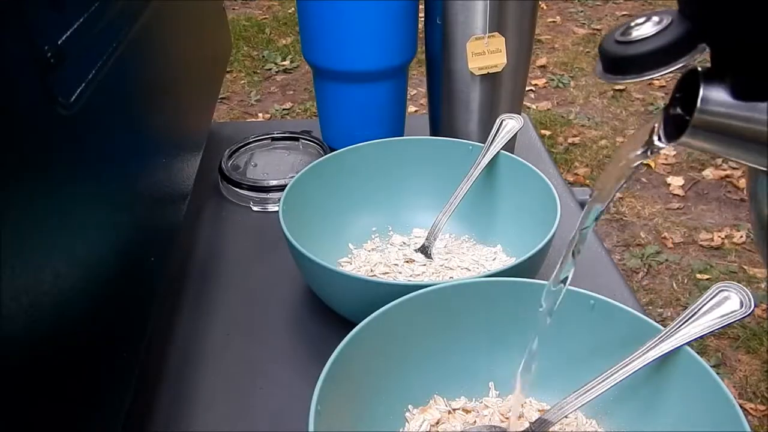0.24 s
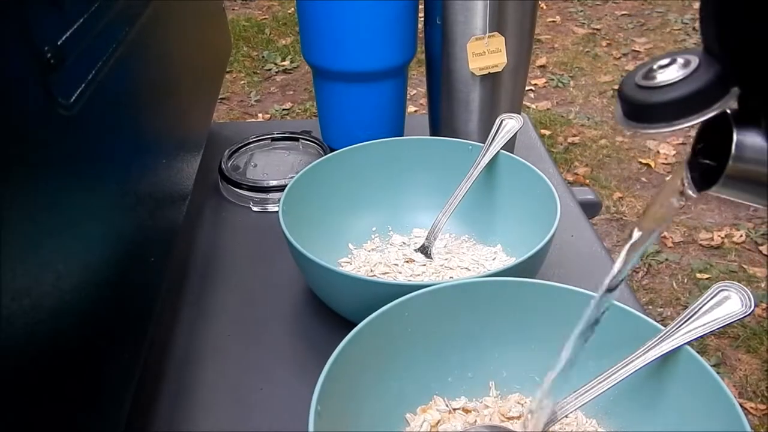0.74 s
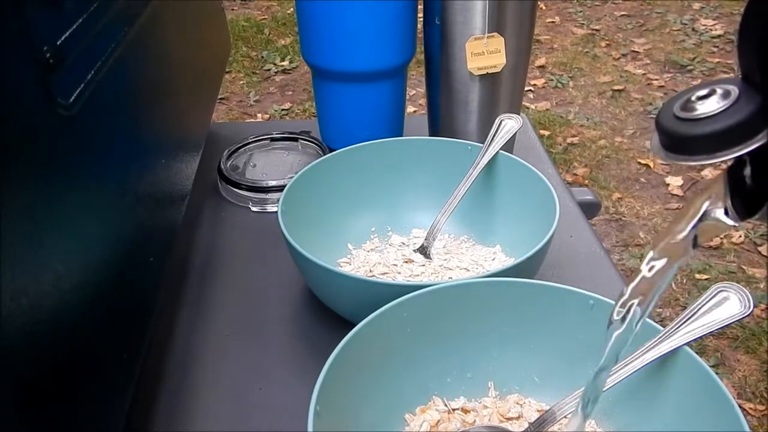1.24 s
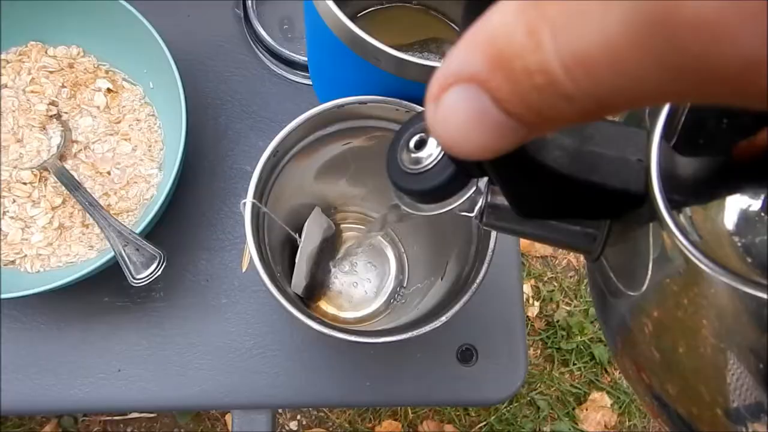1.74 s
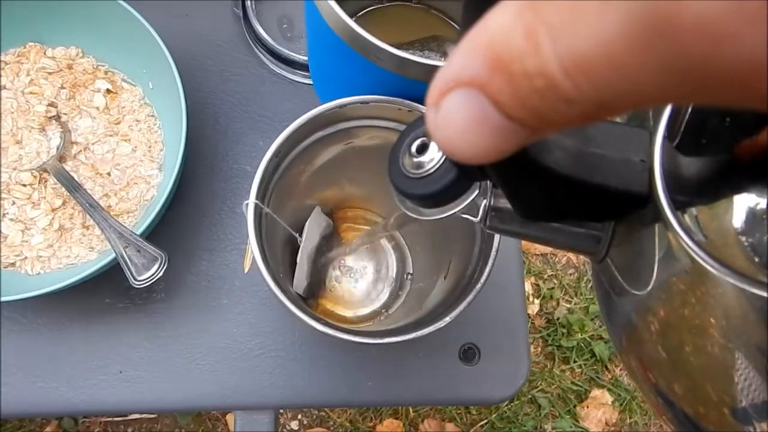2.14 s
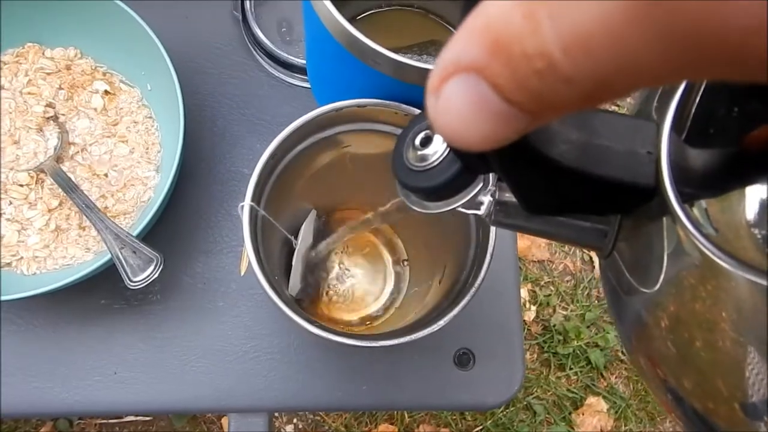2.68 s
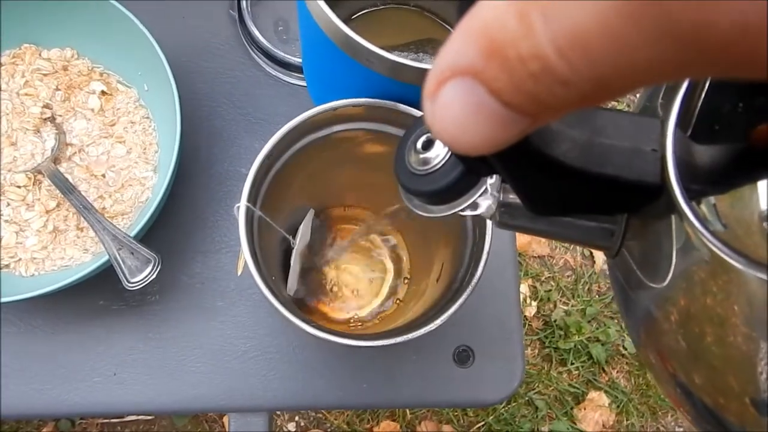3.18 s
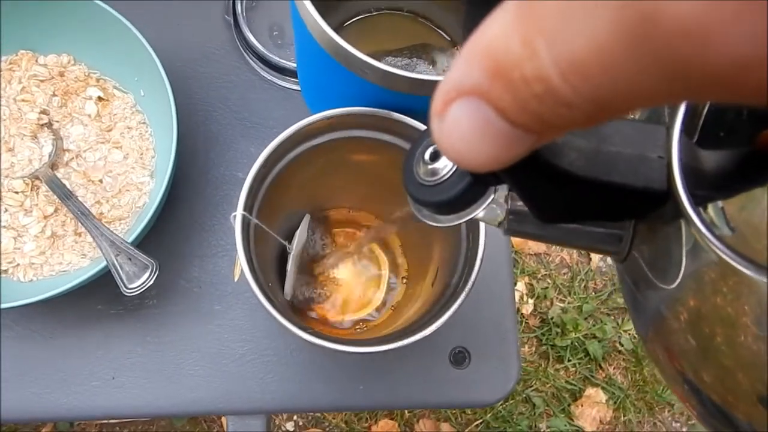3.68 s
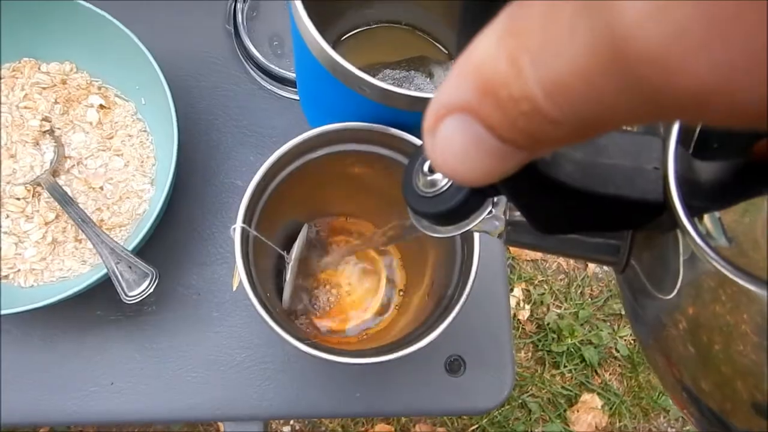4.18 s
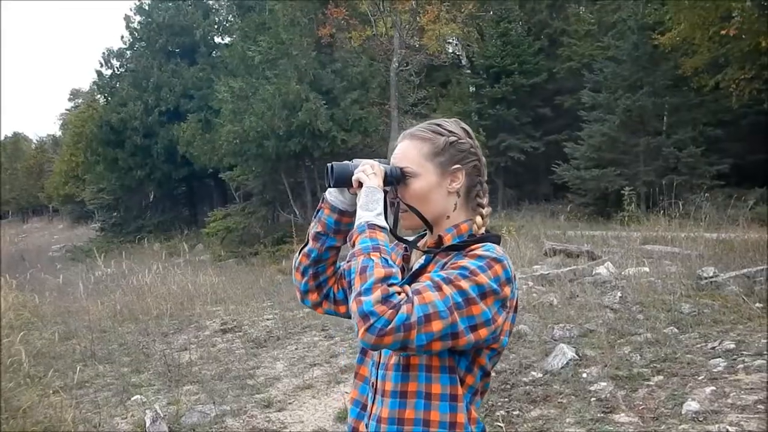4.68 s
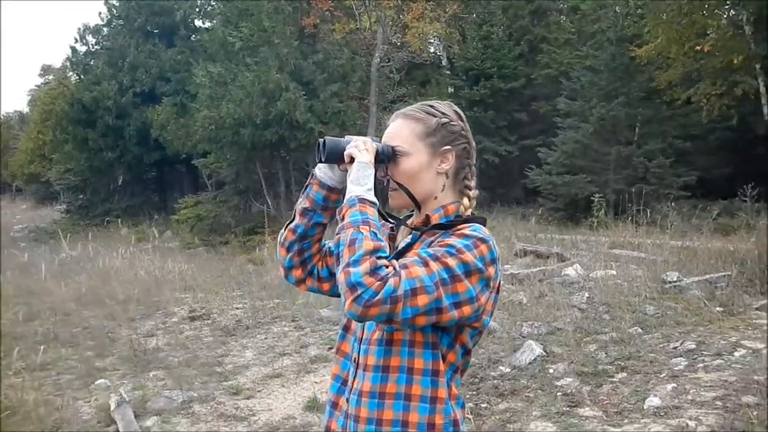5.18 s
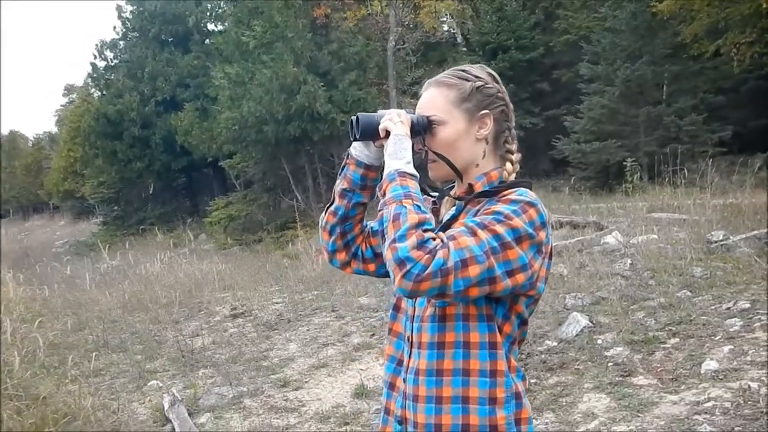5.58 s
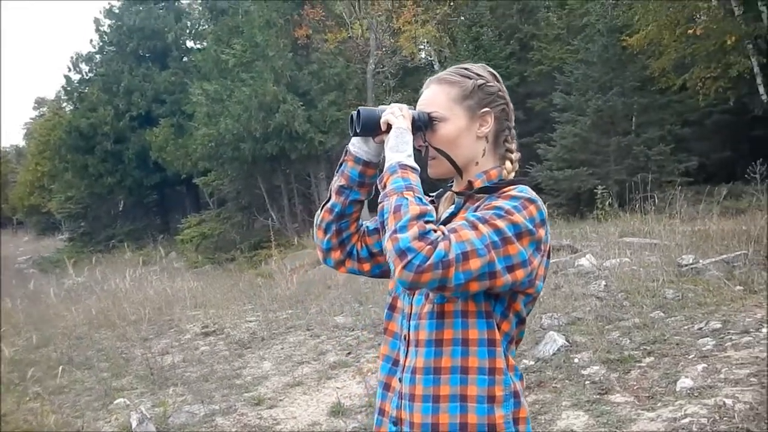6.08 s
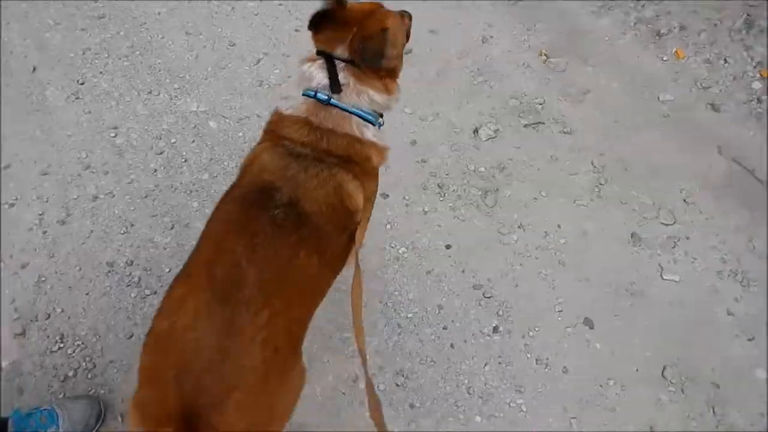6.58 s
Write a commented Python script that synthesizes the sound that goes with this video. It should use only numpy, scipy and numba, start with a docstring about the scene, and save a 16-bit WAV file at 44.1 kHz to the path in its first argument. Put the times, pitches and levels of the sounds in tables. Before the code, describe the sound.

Outdoors, close to the microphone, a thin stream of water fizzes and drips on dry oats with a small knock. It cuts to splashy pouring in a steel mug, hollow and ringing, growing denser as it fills, with metallic kettle knocks. The pouring stops abruptly into a quiet meadow with a faint bird whistle, small ticks and soft lapping water. After a tiny gap, gravel crunches underfoot.

```python
"""Campsite, heard close: drops and fizz of hot water (short noisy pings) spatter into a bowl of oats, with a
knock. The stream then slaps into a tall steel mug: pings and noise drive air column resonances that rise as it
fills, while rim resonances spray and kettle knocks (damped modes) ring out. After a hard cut, a quiet meadow:
thin bird whistles (gliding sines), then lapping grains and gurgling bubbles (rising sines). After a short gap,
steps crunch on gravel (clumped grains). Leaves, hum and breeze (shaped noise) lie under it all; under the mug
the pour swells the hiss and the low noise."""
import sys
import numpy as np
from scipy import signal
from scipy.fft import rfft, irfft, next_fast_len
from scipy.io import wavfile
from scipy.ndimage import uniform_filter1d, map_coordinates
from numba import njit

SR = 44100
rng = np.random.default_rng(int(sys.argv[2]) if len(sys.argv) > 2 else 0)


def to_wav(sig):
    """Store sig (one row per channel, or 1-D mono) as 16-bit WAV at the path in sys.argv[1].

    Samples outside -1..1 are clipped; the rate is SR.
    """
    pcm = np.clip(np.atleast_2d(sig), -1, 1) * 32767
    pcm = np.round(pcm).astype(np.int16)
    wavfile.write(sys.argv[1], SR, pcm.T)  # frames by channels


N = 301016

# Levels are relative: sources pass later gains and filters. Colours are dB per Hz. background of each shot:
# start t/s, wide hiss level/dB at start, at end (leaves; in the mug shot the pour's hiss), low noise level/dB
# at start, at end (breeze; in the mug shot the slosh of the pour), microphone hiss level/dB
SHOT_BACKGROUND = [(0, -57.5, -56, -66, -78, -73), (1.75, -57, -53, -73, -60.5, -72),
                   (4.47, -58, -62, -74.5, -80, -77), (5.25, -60, -59, -63, -72, -76),
                   (5.43, -60, -62, -92, -80, -77.5), (6.49, -53, -55.5, -65, -84, -74.5)]
# colour of the far leaves: f/Hz, level/dB
LEAF_COLOUR = [(100, -11.5), (150, -5.5), (300, -7.5), (600, -8.5), (1200, -7), (2200, -11.5), (4000, -6),
               (8000, -11)]
# left-right likeness of the leaves: f/Hz, correlation
LEAF_ALIKE = [(60, 0.21), (180, 0.76), (550, 0.18), (1650, 0.27), (4970, 0.049), (15000, 0.0)]
# colour of the distant hum: f/Hz, level/dB
HUM_COLOUR = [(25, -33), (45, -16), (63, -2), (85, -16), (130, -18), (300, -58)]
# swell of the distant hum: t/s, level/dB
HUM_LEVEL = [(0, -70), (.11, -61), (.25, -69), (.8, -69.5), (1.1, -63), (1.4, -68), (1.74, -79),
             (2.45, -65), (2.8, -80), (3.2, -65.5), (3.7, -67.5), (4.4, -71), (4.8, -76), (5.15, -77),
             (5.3, -72), (5.5, -92), (6.42, -79), (6.6, -64), (6.83, -86)]
# colour of the breeze buffeting the ports: f/Hz, level/dB
BREEZE_COLOUR = [(25, -25), (50, -9.5), (90, -1.8), (160, -4.5), (300, -13.5), (600, -44.5)]
GUST_DB, GUSTS_PER_S = 4, 3.7
LOW_BALANCE_DB = [[1.2], [-1.2]]  # hum and breeze lean left

# bird whistles, two voices and a faint chip: t/s, length/s, start f/Hz, end f/Hz, start level/dB
WHISTLES = [(4.87, .21, 3605, 3320, -58.5), (4.922, .18, 2740, 2520, -70), (5.898, .05, 3250, 3330, -65)]
CHIRP_EDGE_S, CHIRP_END_DB = .02, -79  # every whistle heads for the same end level
CHIRP_BEND, CHIRP_FLUTTER_DB = 3.2, 4  # the pitch holds, then slides

# wavelets lapping the shore: crest t/s, level/dB
LAPS = [(5.266, -58), (5.279, -58), (5.303, -59), (5.344, -51), (5.367, -59), (5.456, -57), (5.48, -62),
        (5.525, -63), (5.563, -60), (5.6, -61), (5.63, -65), (5.675, -62), (5.72, -66), (5.83, -66),
        (5.93, -66)]
WAVE_RISE_S, WAVE_FALL_S = .003, .012
WASH_S, WASH_DB, WASH_FALL_S = 5.27, -59.5, .6  # one long wash under the wavelets
# colour of the lapping: f/Hz, level/dB
WATER_COLOUR = [(100, -4), (300, -13.5), (1100, -1.5), (2200, -2.5), (4300, 0.5), (9000, -28)]
# weight shifts on the gravel: peak t/s, level/dB
WEIGHT_SHIFTS = [(6.61, -45), (6.705, -48), (6.795, -54)]
CRUNCH_RISE_S, CRUNCH_FALL_S = .022, .016
# steady grit under the shoes: t/s, level/dB
SHOE_GRIT = [(6.508, -54), (6.83, -58)]
# colour of the gravel: f/Hz, level/dB
STONE_COLOUR = [(100, -17), (400, -10), (1700, -2.5), (4300, -1), (9000, -19)]
# small ticks in the meadow and stones under the shoes: t/s, level/dB, f/Hz
SMALL_TICKS = [(4.567, -43.5, 1050), (4.649, -55, 1090), (4.755, -48, 2090), (5.025, -56, 1000),
               (5.097, -54, 1100), (5.342, -49, 1070), (5.348, -50, 2900), (5.387, -46.5, 4240),
               (5.479, -56, 2230), (5.6, -47, 3320), (5.708, -54, 1100), (5.832, -50, 2210),
               (6.514, -50, 1360), (6.541, -47, 1270), (6.607, -45, 4300), (6.642, -39, 4210),
               (6.71, -44, 1770), (6.775, -35, 1660)]

# large bubbles and gurgles: t/s, level/dB, f/Hz, t60/s
BIG_BUBBLES = [(1.769, -47, 210, .11), (1.811, -48.5, 294, 0.14), (1.85, -40, 290, .048),
               (1.871, -37, 308, 0.042), (1.899, -43, 297, .093), (2.011, -43, 297, .14),
               (2.03, -44.5, 529, 0.38), (2.07, -40.5, 568, 0.18), (5.265, -42, 543, .023),
               (5.271, -50, 1000, .091), (5.3, -56, 417, .12), (5.366, -51, 1050, 0.052),
               (5.451, -48, 1310, .069), (5.467, -52, 297, 0.11), (5.505, -57, 700, .2),
               (5.61, -56, 1050, .2), (5.562, -44.5, 1450, .038), (5.9, -54, 480, .071),
               (5.912, -56, 700, .04), (5.922, -52, 860, .04), (5.932, -44, 1030, .034),
               (6.095, -50.5, 1100, .015), (6.27, -62.5, 520, .15), (6.34, -60, 592, .098),
               (6.39, -59, 1926, 0.066)]
BUBBLE_RISE = .09  # the pitch gains twice this share over one t60
# kettle and spoon knocks: t/s, level/dB, brightness/dB per octave
METAL_KNOCKS = [(0.8375, -46.5, 4), (2.754, -42, 1), (2.7603, -16.5, 1.8), (3.4965, -36, 1),
                (3.5005, -29, -8), (4.3865, -36, 1.5)]
# modes of the kettle: f/Hz, level/dB, t60/s
KETTLE_MODES = [(224, -20, 0.08), (322, -3, 0.03), (430, -8, .06), (604, -10, 0.045), (860, -1, 0.028),
                (1016, -5, 0.03), (1560, -9.5, 0.03), (1920, -15, 0.03), (2230, -15, .03),
                (3244, -22, 0.033), (4400, -12, 0.011)]

# dense spatter of the stream on the oats: t/s, level/dB
OAT_FLOW = [(.065, -74), (.075, -50.5), (.16, -53.5), (.19, -64.5), (.38, -62), (.465, -52), (.53, -55),
            (.62, -51), (.92, -51.5), (.96, -60), (1.12, -54.5), (1.2, -47.5), (1.27, -59.5), (1.4, -54.5),
            (1.58, -55), (1.69, -51), (1.75, -54)]
# colour of that spatter: f/Hz, level/dB
OAT_COLOUR = [(200, -2.5), (650, -16), (1700, -11.5), (3000, -2.5), (6000, 1), (12000, -5)]
# single drops in the bowl: t/s, level/dB, f/Hz
OAT_DROPS = [(0.076, -44, 420), (0.077, -46, 1500), (0.088, -48, 400), (0.105, -42, 6000),
             (0.478, -42, 3000), (0.523, -42, 4300), (0.68, -44, 1700), (0.138, -36, 4000),
             (0.149, -34, 4000), (0.154, -28.5, 7540), (0.205, -36.5, 4140), (0.235, -47, 4200),
             (0.288, -41, 4280), (0.326, -34.5, 4250), (0.421, -39.5, 4520), (0.459, -37.5, 4500),
             (0.58, -32.5, 5500), (0.836, -28, 1610), (0.891, -35, 5600), (0.922, -29.5, 3220),
             (1.157, -44, 2920), (1.184, -34.5, 3200), (1.192, -34, 5000), (1.209, -27, 3200),
             (1.242, -37, 2880), (1.371, -37, 5170), (1.472, -38.5, 2980), (1.486, -33.5, 3120),
             (1.498, -35, 3120), (1.516, -39, 3670), (1.537, -31.5, 4560), (1.611, -40, 3120),
             (1.625, -39, 3100), (1.647, -44, 3000), (1.688, -36, 3040)]

# stream into the mug between the slaps: t/s, level/dB
POUR_FLOW = [(1.75, -49.5), (1.93, -59), (2.1, -50), (2.3, -56.5), (2.38, -60.5), (2.55, -54),
             (2.85, -51.5), (2.93, -54), (3.04, -47), (3.13, -64.5), (3.33, -43), (3.41, -61), (3.5, -43.5),
             (3.61, -54), (3.86, -41), (4.05, -47), (4.14, -43.5), (4.465, -44.5)]
# slaps of the broken stream: t/s, upper modes level/dB, lowest mode level/dB, spray level/dB
STREAM_SLAPS = [(1.7678, -26, -54.5, -41.5), (1.778, -30, -55, -48), (1.8042, -37, -57, -66),
                (1.8415, -31.5, -67, -47), (1.8671, -33, -63, -44), (1.897, -35, -62, -49),
                (1.9504, -30, -58, -36), (1.964, -29, -47, -36), (1.9998, -35.5, -62, -46),
                (2.0452, -34, -46, -42), (2.0946, -25, -46, -41.5), (2.084, -40, -50, -43),
                (2.113, -25, -56, -52), (2.1714, -40, -48, -45.5), (2.2042, -27.5, -41.5, -65),
                (2.2377, -24, -43.5, -62), (2.284, -32, -50, -50), (2.3043, -31, -46.5, -44.5),
                (2.32, -38, -55, -45), (2.382, -35, -60, -58), (2.5025, -37, -49, -40.5),
                (2.5353, -30, -40.5, -45.5), (2.5704, -26.5, -34.5, -46), (2.6251, -35, -58, -46),
                (2.6881, -33, -39, -43), (2.7082, -31, -38, -46.5), (2.7294, -29, -35.5, -40),
                (2.7601, -24, -36, -32), (2.819, -33, -59, -44), (2.887, -31, -47, -43.5),
                (2.975, -35, -40, -54), (2.999, -31, -48, -46), (3.041, -26.5, -42, -67),
                (3.0748, -42, -41, -51), (3.1097, -35, -40.5, -52), (3.1576, -35, -43, -43.5),
                (3.202, -28, -41, -45), (3.215, -36, -43, -40), (3.233, -19, -34.5, -38.5),
                (3.2939, -32, -31, -28), (3.3147, -39, -43, -40), (3.345, -19.5, -55, -34),
                (3.3687, -18, -39, -36), (3.4042, -34, -47, -42), (3.426, -19, -33, -33.5),
                (3.4466, -17, -30, -30.5), (3.4767, -26, -33.5, -44), (3.5093, -18, -27.5, -32),
                (3.536, -25.5, -50, -38), (3.5497, -25, -37.5, -42), (3.5697, -29, -48, -47),
                (3.588, -27, -44, -46), (3.5996, -35, -67, -43), (3.6337, -18.5, -42.5, -40),
                (3.6698, -30, -50, -36.5), (3.6958, -28, -32.5, -33.5), (3.7104, -13, -35, -32.5),
                (3.7195, -21, -42, -44), (3.7294, -33, -28.5, -21), (3.7468, -17, -30, -32.5),
                (3.7677, -25, -50, -37), (3.805, -30, -44, -36), (3.8144, -23.5, -27, -40),
                (3.838, -22, -38, -36), (3.8471, -14.5, -29, -36), (3.8603, -23, -34, -28.5),
                (3.8855, -33, -40, -55), (3.9146, -13.5, -37, -46), (3.9304, -23, -38, -30),
                (3.947, -26, -36, -44), (3.9887, -25, -32, -32.5), (4.0127, -22, -40, -38),
                (4.0321, -18, -30.5, -43), (4.0522, -25, -29.5, -27), (4.0615, -21, -33, -37),
                (4.091, -25, -32, -36), (4.1145, -19, -38, -48), (4.126, -22, -45, -41),
                (4.1379, -19, -47, -40), (4.1614, -20.5, -39, -31.5), (4.171, -25, -35, -43),
                (4.2042, -15.5, -47, -29), (4.2175, -24, -34, -31), (4.243, -32, -47, -29.5),
                (4.2506, -11.5, -30.5, -32), (4.281, -30, -36, -43), (4.289, -33, -49, -37),
                (4.2985, -19, -30, -30), (4.3195, -20, -47, -53), (4.337, -26, -46, -36),
                (4.3464, -22, -35, -38), (4.355, -21, -46, -40), (4.369, -13, -49, -32.5),
                (4.3865, -18, -24.5, -35), (4.4143, -17, -39, -36), (4.422, -22, -42, -35.5),
                (4.4417, -19, -58, -33.5), (4.4567, -28, -33, -42.5)]
# the air column shortens and the pool heaves more: t/s, lowest mode f/Hz, heave level/dB
MUG_FILL = [(1.75, 580, -6.5), (2.05, 598, -4.5), (2.6, 629, 1.5), (3.3, 630, 3.5), (4.465, 661, -3)]
# modes of the air column: multiple of the lowest f, width/Hz, level/dB
COLUMN_MODES = [(1, 56, -3), (1.97, 200, -8.5), (2.9, 150, -2.5), (3.25, 200, -7)]
# high resonances of the mug: f/Hz, width/Hz, level/dB
RIM_MODES = [(3170, 450, -6), (3740, 250, -5), (4230, 400, -8), (5923, 350, -6), (7820, 1100, -5)]
# colour of the grains in the mug: f/Hz, level/dB
POUR_COLOUR = [(150, -21.5), (500, 2.5), (9000, -5), (15000, -10.0)]
PUSH_DB, STRIKE_DB, SPRAY_DB = 34.5, 9.5, 21.5  # slap drive of lowest mode, upper modes and rim
STIR_DB, STIR_RISE_S, STIR_FALL_S = -36, 0.0039, 0.022  # each slap stirs up the patter

# difference between the ports for close sounds: f/Hz, level/dB
PORT_SIDE = [(100, -25), (700, -28), (1300, -18), (2400, -17), (4400, -7.5), (8000, -5.5), (15000, -10)]
# paths that reach one port more than the other: delay/ms, gain
SIDE_PATHS = [(0.018, 0.41), (.35, 0.34), (.68, 0.61), (1.3, .4)]
# close sounds carry little deep bass: f/Hz, level/dB
CLOSE_BALANCE = [(40, -45), (150, -11.5), (230, -1.1)]
# colour of the microphone in its housing: f/Hz, level/dB
MIC_COLOUR = [(800, -2.5), (1100, 0.5), (1400, -2.5), (1800, 1.5), (2950, 2.5), (3400, -1.5), (3900, -3),
              (4350, 3), (4700, 0), (5300, -3), (5900, 2.5), (6500, -1.5), (8000, -6), (9000, -13),
              (11000, -15.5), (15700, -27)]
# notch filter centres: f/Hz
NOTCH_CENTRES = [2500, 4000, 5000, 6000, 7000, 8000, 9000, 10000, 11000]
# one notch for each centre: width/Hz, depth as level/dB
NOTCH_SHAPES = [(286, -34), (139, -3), (194, -12.5), (65, -5.5), (31, -10), (76, -25.5), (65, -6),
                (300, -5.5), (76, -8.5)]
# gap at the last cut, end values held outside it: t/s, level/dB
CUT_GAP = [(6.459, 2), (6.461, -26), (6.49, -38), (6.512, 0.5)]
TOP_HZ = 15780


def amp(db):
    """Linear gain of a dB value."""
    return np.exp(np.asarray(db) * np.log(10) / 20)


def unit(x):
    """x scaled to rms 1."""
    return x / np.sqrt(np.mean(x ** 2) + 1e-20)


def along(points, hz):
    """Value of (Hz, value) points read along a log frequency axis."""
    f, v = np.transpose(points)
    return np.interp(np.log(hz + 1), np.log(f + 1), v)


def curve(rows, axis=1):
    """One column of a time table at every sample."""
    rows = np.asarray(rows)
    return np.interp(np.arange(N) / SR, rows[:, 0], rows[:, axis])


def level(rows, axis=1):
    """Gain of a dB column, silent outside the table."""
    t = np.arange(N) / SR
    return amp(curve(rows, axis)) * (t >= rows[0][0]) * (t <= rows[-1][0])


def shots(axis):
    """One column of the shot table, held through each shot."""
    rows = np.asarray(SHOT_BACKGROUND)
    return rows[np.searchsorted(rows[1:, 0], np.arange(N) / SR, "right"), axis]


def shot_glide(start_axis, end_axis):
    """Level in dB gliding from one column to another across each shot."""
    t = np.arange(N) / SR
    start = shots(axis=0)
    ends = np.append(np.asarray(SHOT_BACKGROUND)[1:, 0], N / SR)
    end = ends[np.searchsorted(ends[:-1], t, "right")]
    passed = (t - start) / (end - start)
    return shots(start_axis) + passed * (shots(end_axis) - shots(start_axis))


def swells(s, db, rise_s, fall_s):
    """Gain that rises to each event and dies away after it; silent far from them."""
    t = np.arange(-round(4 * rise_s * SR), round(3 * fall_s * SR)) / SR
    marks = np.bincount(np.round((np.asarray(s) + t[0]) * SR).astype(int), amp(db), N)
    shape = np.exp(np.where(t < 0, t / rise_s, -t / fall_s))
    gain = signal.fftconvolve(marks, shape)[:N]
    return gain * (gain > 1e-7)  # clears numerical residue


def filtered(x, response):
    """x times a complex response of frequency."""
    m = next_fast_len(x.shape[-1] + SR // 2)
    return irfft(rfft(x, m) * response(np.fft.rfftfreq(m, 1 / SR)), m)[..., :x.shape[-1]]


def causal(points):
    """Minimum-phase response with the gain of (Hz, dB) points."""
    def response(hz):
        cepstrum = irfft(np.log(amp(along(points, hz)) + 1e-6))
        cepstrum[1:len(hz) - 1] *= 2
        cepstrum[len(hz):] = 0
        return np.exp(rfft(cepstrum))
    return response


def resonances(f, centres, widths, gains):
    """Sum of band-pass resonances, each with its own signed gain at the centre."""
    return sum(g * 1j * f * w / (c * c - f * f + 1j * f * w) for c, w, g in zip(centres, widths, gains))


@njit
def resonate(x, hz, width, sr):
    """A two-pole resonance whose centre moves; peak gain about 1."""
    y, r = np.zeros(len(x)), np.exp(-np.pi * width / sr)
    for i in range(2, len(x)):
        drive = (1 - r) * (x[i] - x[i - 2])
        y[i] = drive + 2 * r * np.cos(2 * np.pi * hz[i] / sr) * y[i - 1] - r * r * y[i - 2]
    return y


def rush(spectrum, alike):
    """Stereo noise of rms 1; the split of mid and side sets the left-right likeness."""
    def mid_side(hz):
        turn = np.arccos(np.clip(along(alike, hz), -1, 1)) / 2
        return amp(along(spectrum, hz)) * [np.cos(turn), np.sin(turn)]
    mid, side = filtered(rng.standard_normal((2, N)), mid_side)
    return unit(np.array([mid + side, mid - side]))


def pings(s, size, hz, t60, rise, noisy, count=1024):
    """Damped sines, rising if asked, mixed with a puff of noise, one per event."""
    t = np.arange(count) / SR
    s, size, hz, t60, rise = (np.reshape(v, (-1, 1)) for v in (s, size, hz, t60, rise))
    tone = np.sin(2 * np.pi * hz * t * (1 + rise * t / t60))
    body = (1 - noisy) * tone + noisy * rng.standard_normal((len(s), count))
    body = size * body * amp(-60 * t / t60) * (1 - np.exp(-3 * t * hz))
    body = body * np.cos(np.pi / 2 * np.arange(count) / count)  # long rings close softly
    at = np.round(s * SR).astype(int) + np.arange(count)
    return np.bincount(at.ravel(), body.ravel(), N + count)[:N]


def spatter(gain, colour, count, spread_db, centre_hz, cycles, noisy, clump_db):
    """Dense random grains, rare ones much larger, coming in clumps under the gain."""
    draw, pitch = rng.random((count, 2)), rng.standard_normal(count)
    start, stop = np.flatnonzero(gain)[[0, -1]]
    span = (stop - start) / SR
    clumps = map_coordinates(rng.standard_normal(128), [draw[:, 0] * span * 40])  # 40 points a second
    hz = np.clip(centre_hz * np.exp(.8 * pitch), 150, 12000)
    size = amp(clump_db * clumps - spread_db * np.log(1 - draw[:, 1] * .99))
    x = pings(start / SR + draw[:, 0] * span, size, hz, cycles / hz, 0.18, noisy, count=288)
    x[start:stop] = unit(filtered(x[start:stop], causal(colour)))
    return gain * x


def clicks(rows, cycles, noisy, gain_db):
    """Single drops, ticks or stones: short noisy rings, each at its own pitch."""
    s, db, hz = np.transpose(rows)
    return pings(s, amp(db + gain_db), hz, 0.0056 + cycles / hz, 0.027, noisy)


def leaves():
    """Far leaves: wide hissing noise that drifts in level through each shot; in the mug shot the hiss of the
    pour swells it."""
    return amp(shot_glide(1, 2)) * rush(LEAF_COLOUR, LEAF_ALIKE)


def hum():
    """Distant hum: narrow low noise that swells and sinks."""
    return level(HUM_LEVEL) * rush(HUM_COLOUR, [(60, 0.85)]) * amp(LOW_BALANCE_DB)


def breeze():
    """Light breeze: low noise on the ports, its level wandering in gusts; in the mug shot it swells with the
    slosh of the pour."""
    gusts = map_coordinates(rng.standard_normal(64), [np.arange(N) / SR * GUSTS_PER_S])
    gain = amp(shot_glide(3, 4) + GUST_DB * gusts)
    return gain * rush(BREEZE_COLOUR, [(60, 0.89)]) * amp(LOW_BALANCE_DB)


def bird():
    """Thin whistles from the right: gliding sines with a fluttering level."""
    song = np.zeros(N)
    for s, length, start_hz, end_hz, db in WHISTLES:
        u = np.linspace(0, 1, round(length * SR))
        hz = start_hz + (end_hz - start_hz) * u ** CHIRP_BEND
        flutter_db = CHIRP_FLUTTER_DB * map_coordinates(rng.standard_normal(16), [u * length * 60])
        edges = np.clip(np.minimum(u, 1 - u) * length / CHIRP_EDGE_S, 0, 1)
        gain = amp(db + (CHIRP_END_DB - db) * u + flutter_db) * edges
        tone = np.sqrt(2) * np.sin(2 * np.pi * np.cumsum(hz) / SR)
        song[round(s * SR):][:len(u)] += gain * tone
    return song * amp([[-5], [3]])


def lapping():
    """Wavelets break into ringing grains over one long wash."""
    waves = swells(*np.transpose(LAPS), WAVE_RISE_S, WAVE_FALL_S)
    waves = waves + swells([WASH_S], [WASH_DB], WAVE_RISE_S, WASH_FALL_S)
    return spatter(waves, WATER_COLOUR, count=1600, spread_db=3.0, centre_hz=1527, cycles=30,
                   noisy=0.3, clump_db=1.5)


def gravel():
    """Shifting weight grinds the stones: short, noisy grains in crunches over steady grit."""
    steps = swells(*np.transpose(WEIGHT_SHIFTS), CRUNCH_RISE_S, CRUNCH_FALL_S) + level(SHOE_GRIT)
    return spatter(steps, STONE_COLOUR, count=800, spread_db=3.0, centre_hz=2430, cycles=1.9,
                   noisy=0.41, clump_db=1.3)


def ticks():
    """Meadow ticks and single stones: short noisy rings."""
    return clicks(SMALL_TICKS, cycles=10, noisy=0.49, gain_db=8.0)


def gurgles():
    """Large bubbles ring low and rise a little."""
    s, db, hz, t60 = np.transpose(BIG_BUBBLES)
    return pings(s, amp(db), hz, t60, BUBBLE_RISE, 0.051, count=6000)


def kettle():
    """Dull knocks that rattle as they die; brighter ones wake the upper modes more."""
    out, t = np.zeros(N + SR), np.arange(SR // 8) / SR
    for s, db, bright_db in METAL_KNOCKS:
        ring = np.zeros(len(t))
        for hz, mode_db, t60 in KETTLE_MODES:
            mode_gain = amp(mode_db + bright_db * np.log2(hz / 500) - 60 * t / t60)
            ring += mode_gain * np.sin(2 * np.pi * hz * t)
        wobble = unit(uniform_filter1d(rng.standard_normal(len(t)), size=40))
        rattle = 1 + wobble * (1 - amp(-60 * t / 0.012))  # sets in after the blow
        blow = (1 + 4.5 * amp(-60 * t / 0.0024)) * (1 - np.exp(-t / 0.00063))
        out[round(s * SR):][:len(t)] -= amp(db) * ring * rattle * blow
    return out[:N]


def bowl():
    """The stream breaks up on the oats: a fizz of fine grains and single drops."""
    fizz = spatter(level(OAT_FLOW), OAT_COLOUR, count=3000, spread_db=2.6, centre_hz=4000, cycles=10,
                   noisy=0.3, clump_db=1.9)
    return fizz + clicks(OAT_DROPS, cycles=8.0, noisy=0.43, gain_db=3.5)


def mug():
    """Slaps, a dense patter and the heaving pool excite the air column and the high resonances."""
    s, db, low_db, spray_db = np.transpose(STREAM_SLAPS)
    shot = np.arange(N) / SR < POUR_FLOW[-1][0]  # the cut ends the column's ringing
    flow = level(POUR_FLOW) + shot * swells(s, db + STIR_DB, STIR_RISE_S, STIR_FALL_S)
    patter = spatter(flow, POUR_COLOUR, count=3000, spread_db=5, centre_hz=2140, cycles=4,
                     noisy=0.5, clump_db=1.5)
    churn = spatter(flow, POUR_COLOUR, count=1500, spread_db=3.2, centre_hz=580, cycles=2.5,
                    noisy=0.34, clump_db=1.5)
    churn = churn * level(MUG_FILL, axis=2)
    bubbles = spatter(flow, POUR_COLOUR, count=500, spread_db=3.5, centre_hz=1250, cycles=16,
                      noisy=.05, clump_db=1.5)

    shape = rng.standard_normal((len(s), 2))  # every slap has its own colour
    strike_hz = 1700 * np.exp(0.12 * shape[:, 0])
    spray_hz = 4600 * np.exp(.2 * shape[:, 1])
    push = pings(s, amp(low_db + PUSH_DB), 600, 0.0032, 0, .12, count=256)
    stir = amp(4.5) * level(POUR_FLOW) * rng.standard_normal(N)
    low = push + amp(7.5) * churn + stir
    strike = pings(s, amp(db + STRIKE_DB), strike_hz, 0.0026, 0, 0.2, count=256)
    upper = strike + amp(2.0) * patter
    spray = pings(s, amp(spray_db + SPRAY_DB), spray_hz, 0.0067, 0, 0.63, count=384)
    spray = spray + amp(6) * patter
    spray[260:] += 0.2 * spray[:-260]  # spray falls back a moment later

    column = np.zeros(N)
    for drive, (multiple, width, mode_db) in zip([low, upper, upper, upper], COLUMN_MODES):
        column += amp(mode_db) * resonate(drive, multiple * curve(MUG_FILL), width, SR)
    slosh = amp(-1.5) * filtered(churn, lambda f: 1 / (1 + 1j * f / 190) ** 2)
    centres, widths, rim_db = np.transpose(RIM_MODES)
    signs = (-1) ** np.arange(len(centres))  # neighbouring rim modes alternate in sign

    def rim(f):
        direct = amp(-18.0) / (1 + 1j * f / 7000) ** 2
        return resonances(f, centres, widths, signs * amp(rim_db)) + direct
    return shot * (column + slosh) + filtered(spray, rim) + amp(-9.5) * bubbles


def ports(x, side_db, scatter_db):
    """The two ports hear the same sound plus and minus short side paths and a diffuse scatter."""
    tail = rng.standard_normal(900) * amp(-60 * np.arange(900) / SR / .012)
    scatter = amp(scatter_db) * signal.fftconvolve(x, tail / np.linalg.norm(tail))[:N]
    paths = lambda hz: sum(g * np.exp(-2j * np.pi * hz * ms / 1000) for ms, g in SIDE_PATHS)
    side = filtered(x, paths) + scatter
    side = amp(side_db) * filtered(side, causal(PORT_SIDE))
    return filtered(np.array([x + side, x - side]), causal(CLOSE_BALANCE))


def scene():
    """Open air and bird, then the ground and shore, then the close water and metal."""
    background = leaves() + hum() + breeze() + bird()
    ground = ports(lapping() + gravel() + ticks(), side_db=3.5, scatter_db=1.9)
    close = ports(gurgles() + kettle() + bowl() + mug(), side_db=-1.5, scatter_db=-1.5)
    return background + ground + close


def record(dry):
    """Microphone colour and hiss, notch filters, the gap at the cut and the band limit."""
    wet = filtered(dry, causal(MIC_COLOUR))
    wet = wet + amp(shots(axis=5)) * rng.standard_normal(dry.shape)

    def notches(f):
        response = 1
        for centre, (width, depth_db) in zip(NOTCH_CENTRES, NOTCH_SHAPES):
            response = response * (1 - resonances(f, [centre], [width], [1 - amp(depth_db)]))
        return response
    gapped = filtered(wet, notches) * amp(curve(CUT_GAP))
    return filtered(gapped, lambda hz: hz < TOP_HZ)


dry = scene()
out = record(dry)
to_wav(out)
```